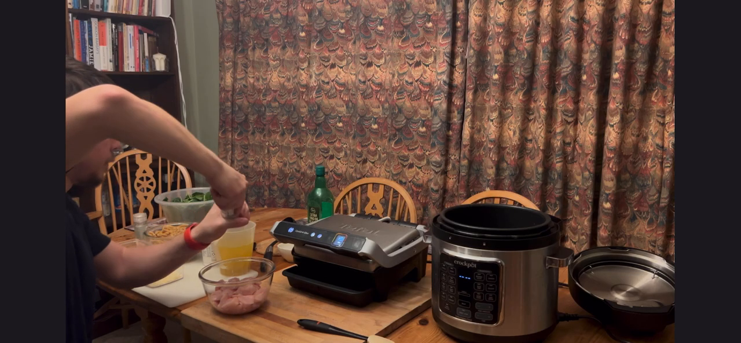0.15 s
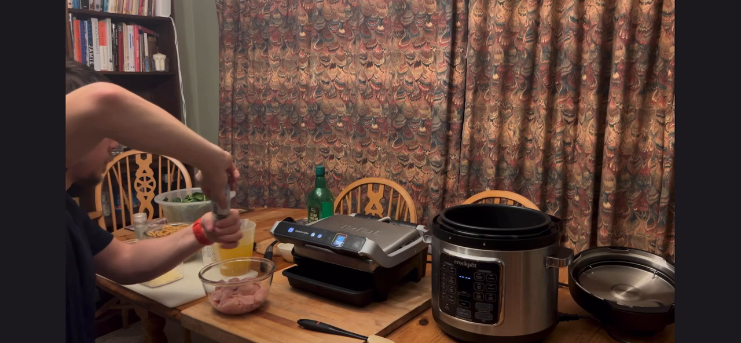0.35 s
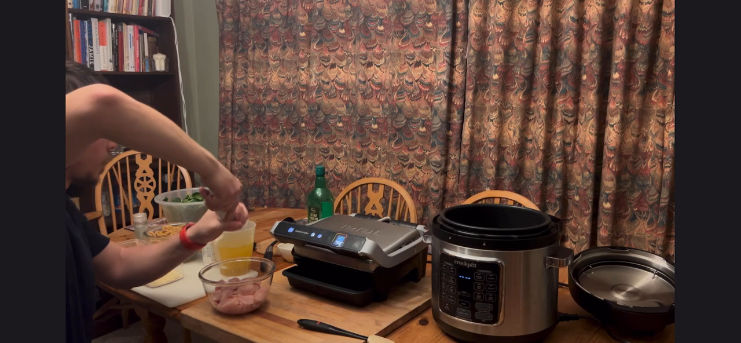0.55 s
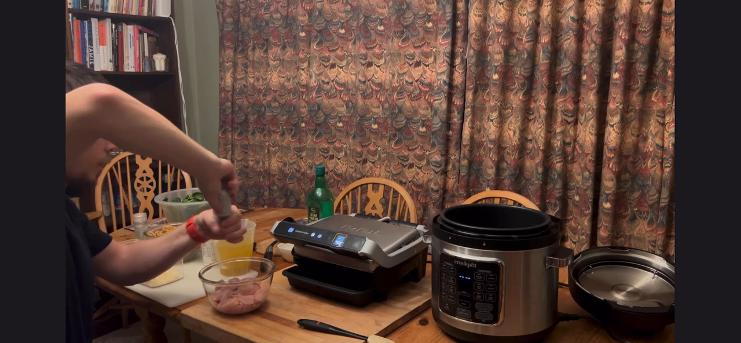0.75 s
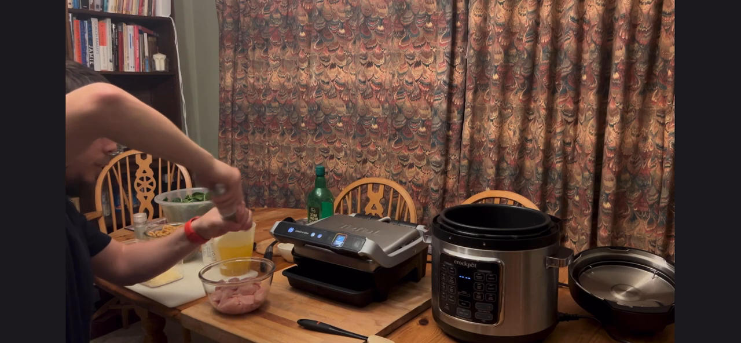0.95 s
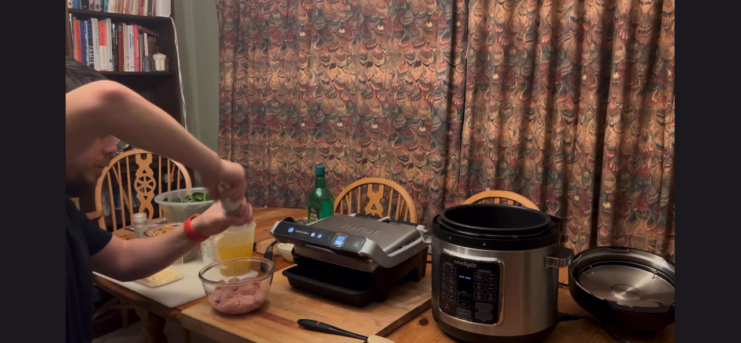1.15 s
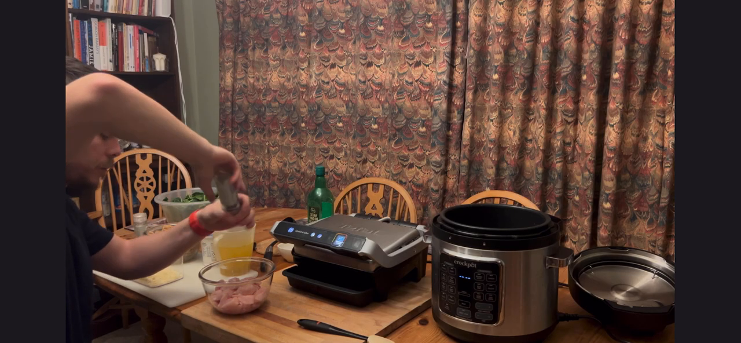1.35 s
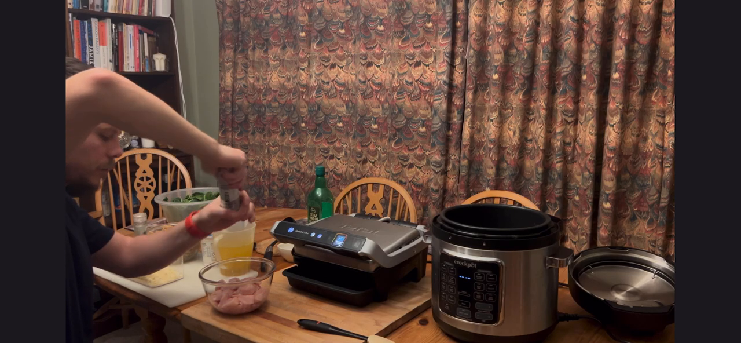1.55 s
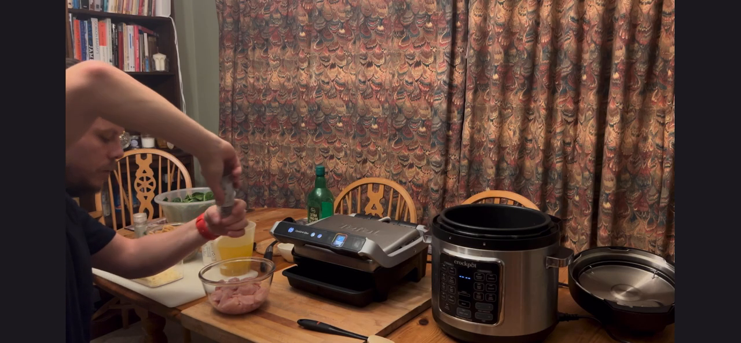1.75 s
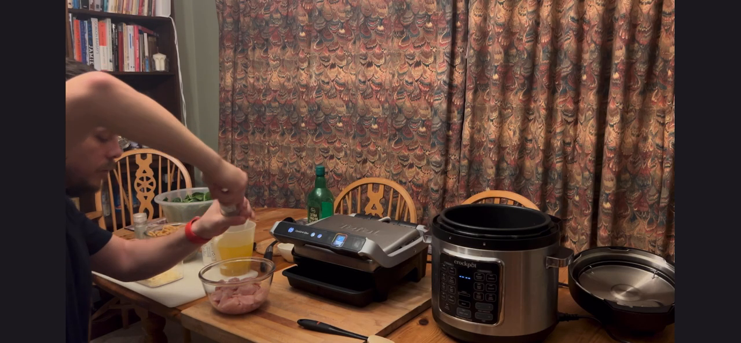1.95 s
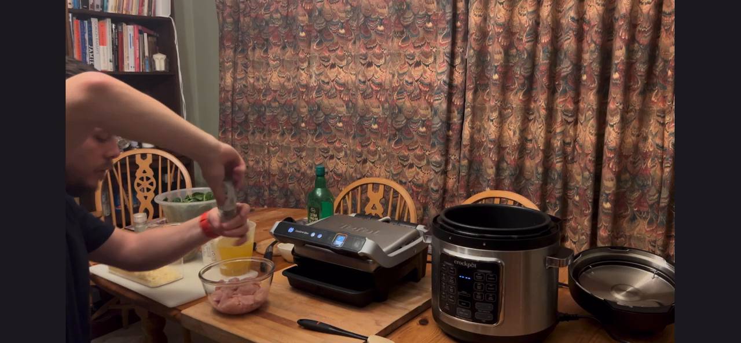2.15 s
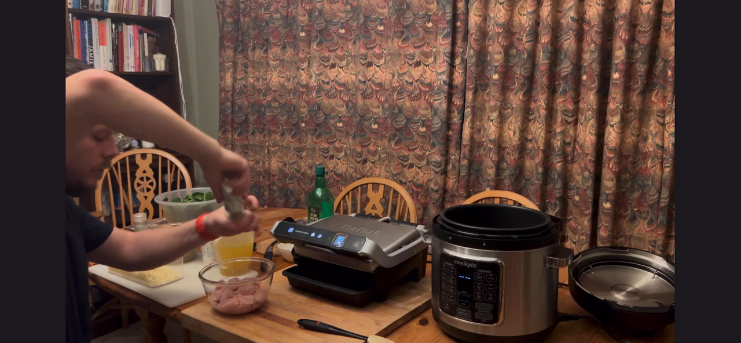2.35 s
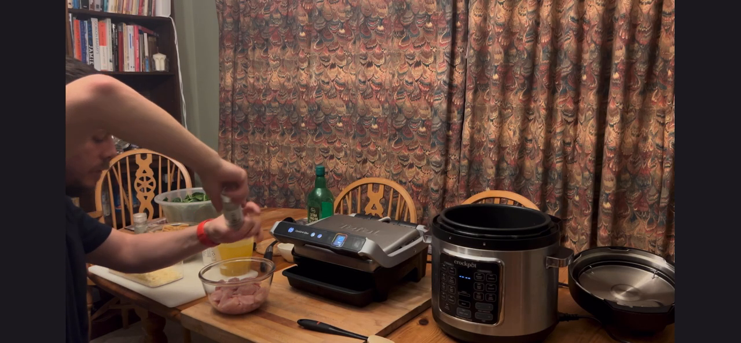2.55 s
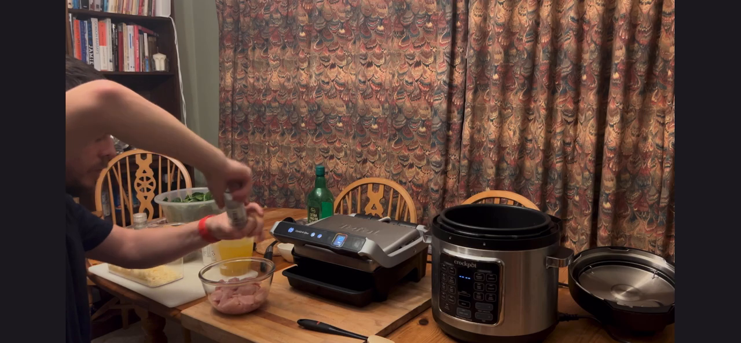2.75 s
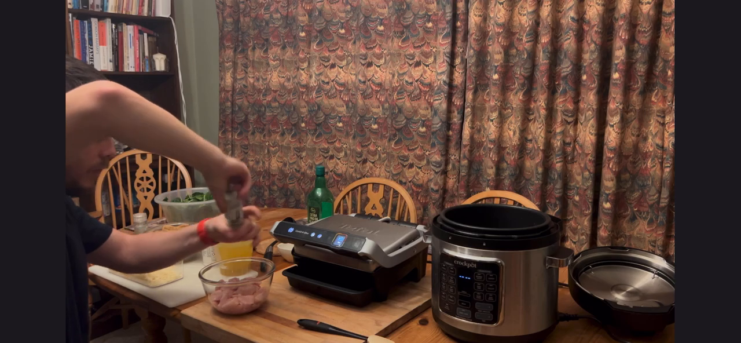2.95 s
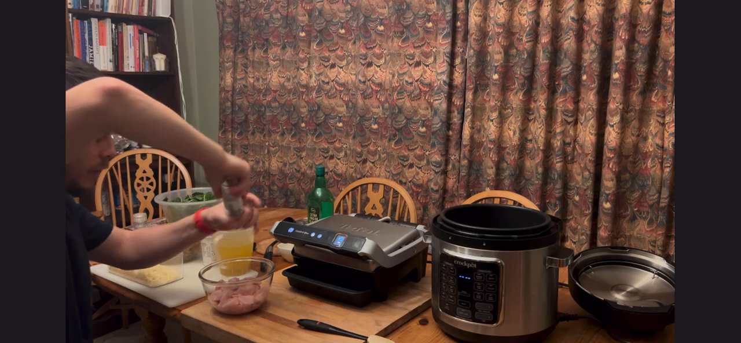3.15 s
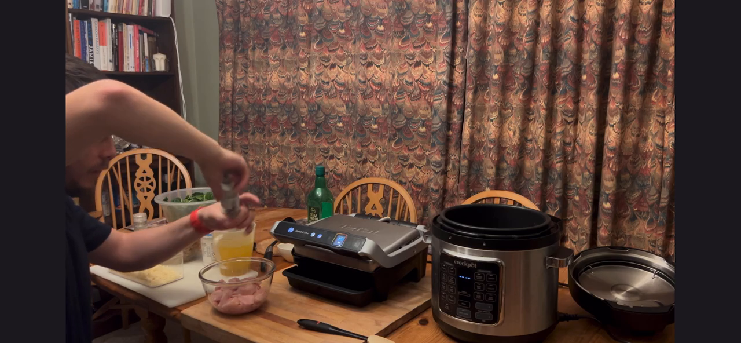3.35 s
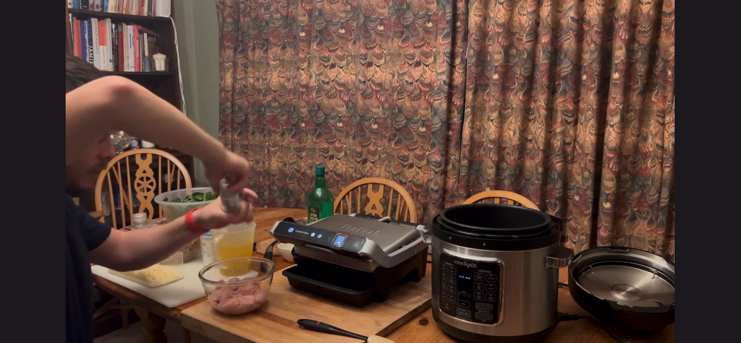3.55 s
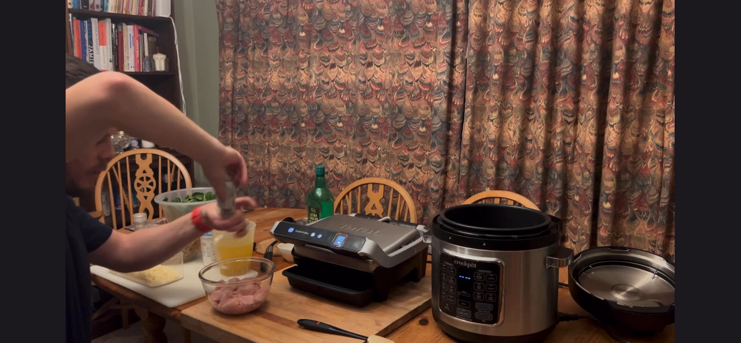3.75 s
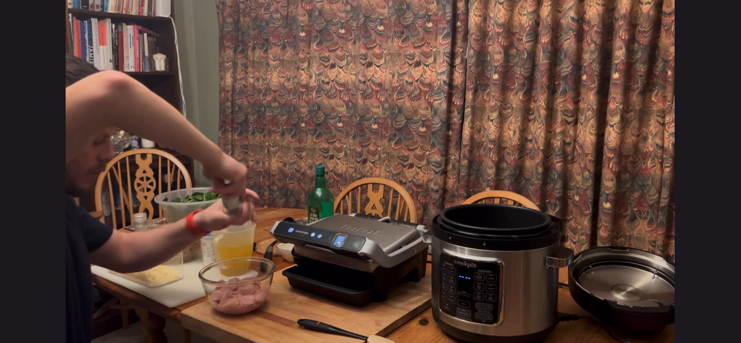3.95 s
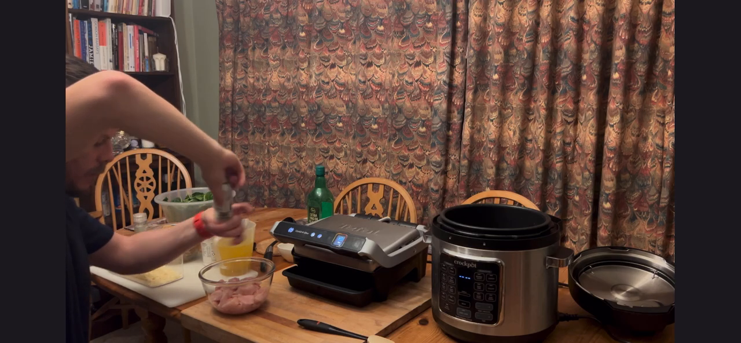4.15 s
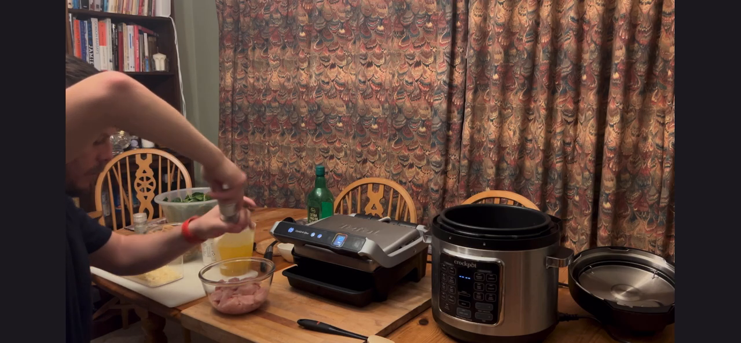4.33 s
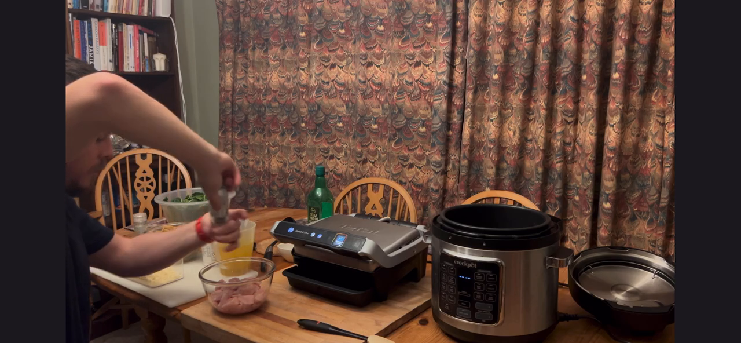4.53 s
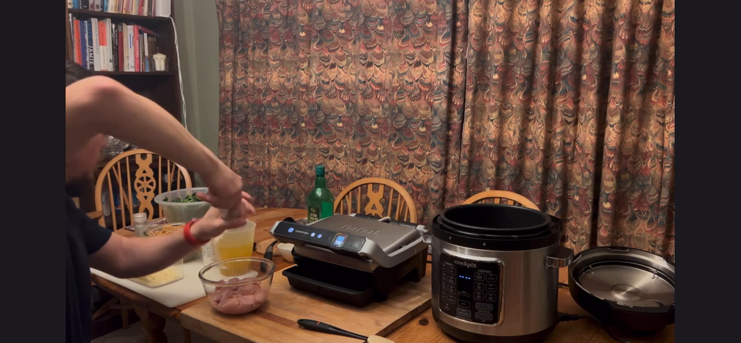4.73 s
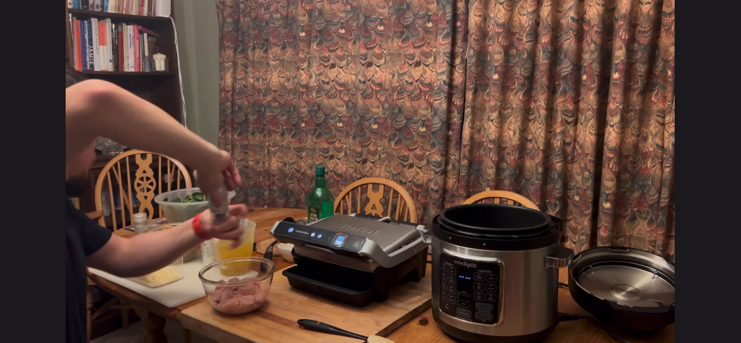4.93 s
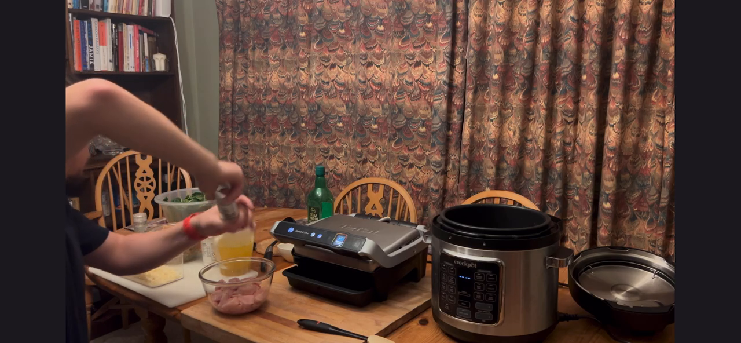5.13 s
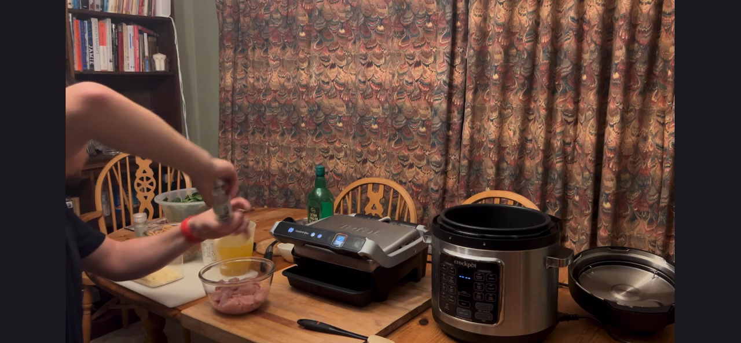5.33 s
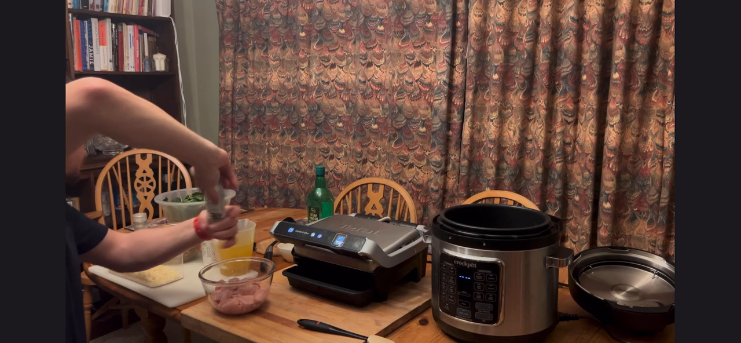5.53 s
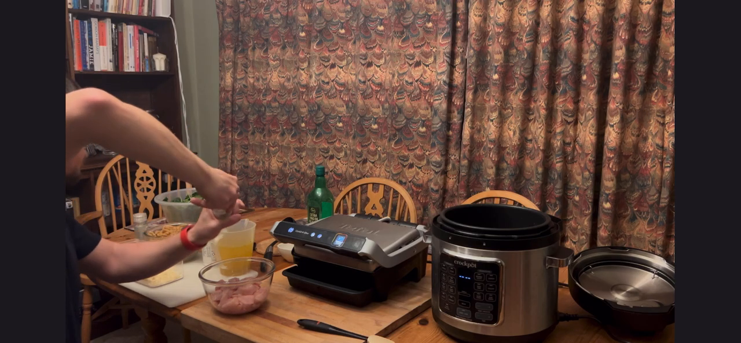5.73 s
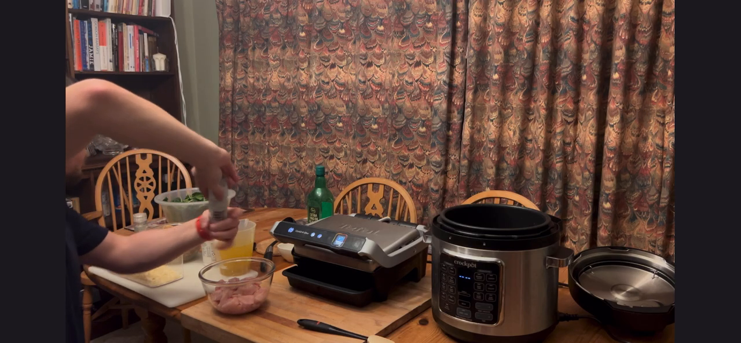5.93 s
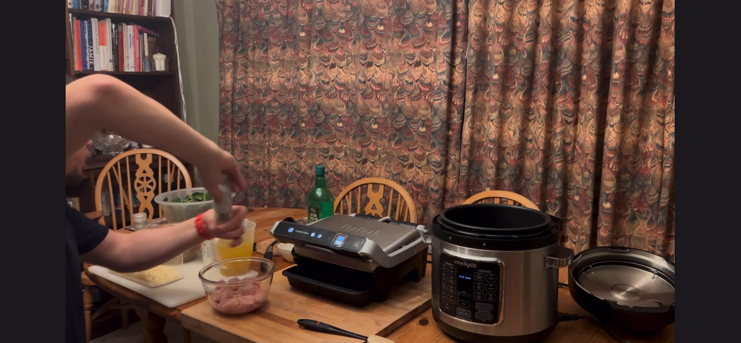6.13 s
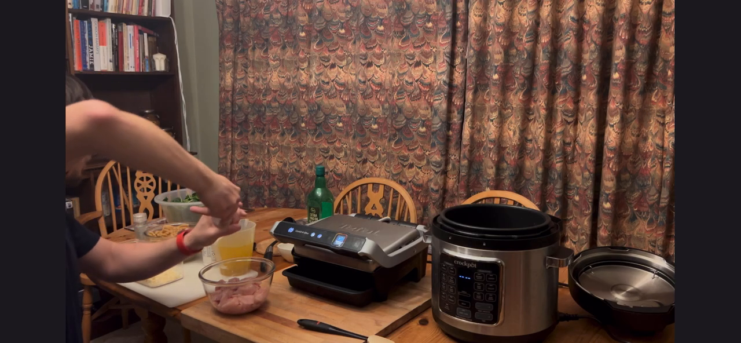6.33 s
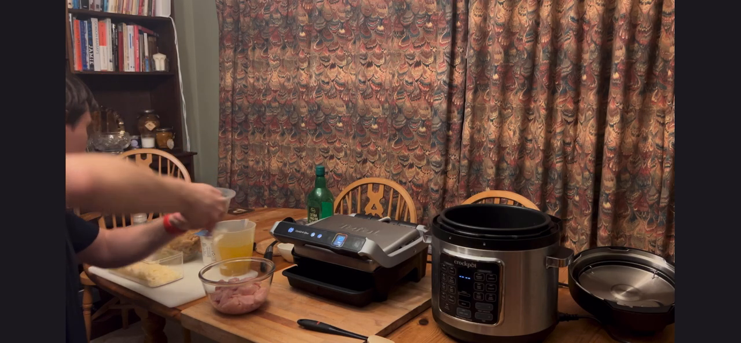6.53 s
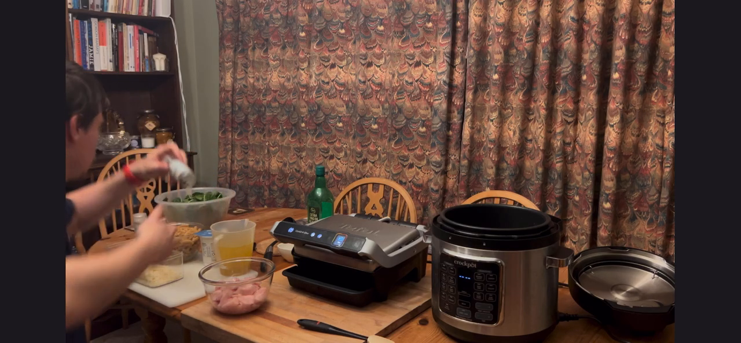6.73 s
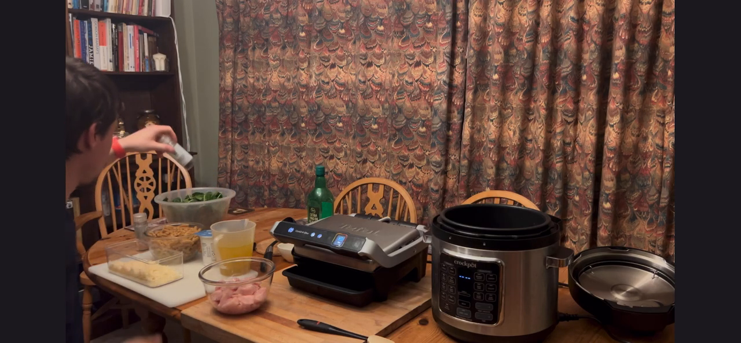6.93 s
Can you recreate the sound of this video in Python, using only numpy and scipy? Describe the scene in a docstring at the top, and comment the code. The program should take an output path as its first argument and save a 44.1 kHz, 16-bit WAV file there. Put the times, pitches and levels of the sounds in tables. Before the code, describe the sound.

A hand pepper mill is twisted in short, quick strokes, crunching and crackling unevenly in a small kitchen, then lifted away with a faint metallic tinkle.

```python
"""In a kitchen, a hand pepper mill is twisted back and forth over a bowl, four or five short twists a second.
The crunch is thousands of tiny noise snaps, coloured by the mill's barrel; its body rumbles underneath.
Sharp cracks are short noise bursts of corns and chips breaking; dull knocks are low bursts from the shaft.
Hands brush the mill in soft noise; at the end it is lifted away and its spring tinkles at a few pitches.
Fading noise makes the room's echo, and a faint hiss and low hum fill the quiet."""
import sys
import numpy as np
from scipy import signal
from scipy.fft import rfft, irfft, next_fast_len
from scipy.io import wavfile
from scipy.ndimage import uniform_filter1d, map_coordinates

SR = 44100
rng = np.random.default_rng(int(sys.argv[2]) if len(sys.argv) > 2 else 0)


def generate_wav(sig):
    """Save sig (samples, or channels by samples) to the path in sys.argv[1] as 16-bit PCM at SR."""
    pcm = np.round(np.clip(np.atleast_2d(sig).T, -1, 1) * 32767).astype(np.int16)
    wavfile.write(sys.argv[1], SR, pcm)


N = 312183  # length [samples]
TOP_HZ = 16100  # upper band limit


def amp(db):
    """Turn decibels into a gain."""
    return 10 ** (np.asarray(db) / 20)


def unit(x):
    """Scale to an average (rms) level of 1."""
    return x / np.sqrt(np.mean(x ** 2) + 1e-20)


def along(points, hz):
    """Read a curve of (frequency, value) points, joined by straight lines on a log frequency axis."""
    point_hz, value = np.transpose(points)
    return np.interp(np.log(hz + 1), np.log(point_hz + 1), value)


def bump(hz, centre_hz, octaves):
    """A bell-shaped curve around centre_hz on a log frequency axis, 1 at its top."""
    return np.exp(-(np.log2((hz + 1) / centre_hz) / octaves) ** 2)


def wobble(rate):
    """A smooth random curve through `rate` random points a second."""
    position = np.arange(N) * rate / SR
    return map_coordinates(rng.standard_normal(4096), [position], order=2, mode="wrap")


def resonances(modes, hz):
    """Each mode rings at its own frequency, and a wider mode dies away sooner; their responses add up."""
    total = 0
    for k, (centre, width, db) in enumerate(modes):
        mode = 1j * hz * width / (centre * centre - hz * hz + 1j * hz * width)
        total = total + (-1) ** k * amp(db) * mode  # neighbours have opposite signs
    return total


def filtered(x, response):
    """Multiply the spectrum of x by a response that depends on frequency."""
    m = next_fast_len(N + SR // 2)
    return irfft(rfft(x, m) * response(np.fft.rfftfreq(m, 1 / SR)), m)[..., :N]


def struck(x, colour_db, size=4096):
    """Colour x with a filter of energy 1 that answers only after each hit, never before it."""
    # folding the cepstrum onto its first half gives the minimum-phase filter
    cepstrum = irfft(np.log(amp(colour_db(np.fft.rfftfreq(size, 1 / SR))) + 1e-6))
    cepstrum[1:size // 2] *= 2
    cepstrum[size // 2 + 1:] = 0
    response = irfft(np.exp(rfft(cepstrum)))
    return signal.fftconvolve(x, response / np.linalg.norm(response))[:N]


def add(track, s, sound):
    """Mix a sound into a track at time s [s]."""
    start = max(0, round(s * SR))
    part = track[start:start + len(sound)]
    part += sound[:len(part)]


# twists of the mill: (start [s], end [s], relative crunch level [dB], growth from start to end [dB])
MILL_TWISTS = [(0, 0.096, -36.5, -6.5), (0.155, 0.27, -40.5, -3), (0.341, 0.432, -37, 5),
               (0.723, 0.822, -38, -6), (1.057, 1.173, -35, -1), (1.424, 1.477, -37, 7.5),
               (1.814, 1.864, -34, 8), (1.915, 1.96, -47, 6), (2.01, 2.134, -41, 7),
               (2.232, 2.278, -39.5, -8), (2.493, 2.543, -35, -4), (2.661, 2.754, -37.5, 9),
               (2.87, 2.99, -45.5, -10), (3.05, 3.176, -39, 6), (3.252, 3.38, -41.5, 1),
               (3.432, 3.568, -38, -3.5), (3.616, 3.755, -45, -2.5), (3.817, 3.947, -39, 2),
               (4.024, 4.135, -40, 2), (4.213, 4.335, -40.5, 4.5), (4.413, 4.538, -41, -4.5),
               (4.593, 4.722, -38.5, 2.5), (4.792, 4.917, -41.5, 7), (5.013, 5.149, -36, 9),
               (5.2, 5.357, -45.5, 0), (5.45, 5.599, -41, 12.5), (5.703, 5.871, -44, 3),
               (5.909, 5.93, -41.5, 5), (6.032, 6.194, -39.5, 7)]
TWIST_ARCH_DB = 1  # the hand presses hardest midway through a twist


def effort(ramp=0.0097):
    """Strength of the crunch: a twist bites within ramp [s], grows or fades, arches in its middle, and stops."""
    force = np.zeros(N)
    for start, end, db, growth_db in MILL_TWISTS:
        t = np.arange(max(round((end - start) * SR), 2)) / SR
        turning = np.clip(np.minimum(t, t[-1] - t) / ramp, 0, 1)
        progress = t / t[-1] - .5
        arch_db = TWIST_ARCH_DB * (np.cos(np.pi * progress) - 2 / np.pi)
        add(force, start, turning * amp(db + growth_db * progress + arch_db))
    return force


def fragments(count, spread_db, clump_db, clump_rate, t60, ring_db, size=96):
    """Tiny fractures at random moments, mostly small and in clumps; each lifts or cuts its own pitch band."""
    draws = rng.random((count, 3))
    strength = amp(spread_db * np.minimum(-np.log(1 - draws[:, 1]), 2.5))
    pitch_hz = 1500 * 10 ** draws[:, 2:]  # anywhere from 1500 to 15000 Hz
    colour = amp(ring_db * bump(np.fft.rfftfreq(size, 1 / SR), pitch_hz, octaves=0.27))
    noise = irfft(rfft(rng.standard_normal((count, size))) * colour)
    snaps = noise * amp(-60 * np.arange(size) / SR / t60)  # 60 dB down after t60 [s]
    where = (draws[:, :1] * N).astype(int) + np.arange(size)
    run = np.bincount(where.ravel(), (snaps * strength[:, None]).ravel(), N)[:N]
    run = run * amp(clump_db * wobble(clump_rate))
    # the hand's steady pressure evens the run out over 40 ms
    power = np.abs(uniform_filter1d(run ** 2, SR // 25))
    return run / np.sqrt(power + np.mean(run ** 2) / 20)


# breaking pepper heard through the mill: (frequency [Hz], relative level per Hz [dB])
CRUNCH_COLOUR = [(100, -43), (300, -12), (620, -22), (900, -6.5), (1300, -12), (1700, -4), (2700, -12),
                 (3600, -2), (5200, -7), (6500, -1), (8000, 1.5), (10500, -0.5), (13000, -4.5),
                 (15500, -7.5)]
# resonances of the mill's barrel: (frequency [Hz], width [Hz], lift, or dip if negative [dB])
BARREL_MODES = [(1010, 340, -5), (1760, 260, -5), (2020, 110, -4), (3360, 250, -0.5), (4300, 480, 1),
                (4350, 810, 0), (5000, 350, 0), (6000, 540, 2), (8050, 170, 3)]


def barrel_db(hz):
    """Colour of a break inside the mill: a broad crunch, raised or lowered at the barrel's resonances."""
    colour_db = along(CRUNCH_COLOUR, hz)
    for centre, width, db in BARREL_MODES:
        colour_db = colour_db + db / (1 + (2 * (hz - centre) / width) ** 2)
    return colour_db


# modes of the hollow body shaken by the shaft: (frequency [Hz], width [Hz], relative level [dB])
BODY_MODES = [(209, 56, -9.5), (293, 95, -10), (354, 54, -2.5), (393, 42, 0.5), (465, 53, -2.5),
              (534, 88, -12), (770, 79, -10.5)]


def grinding(force, crunch_db=-4.5, rumble_db=-55.0, follow=0.38):
    """Each twist crumbles pepper between the burrs, and the jerking shaft shakes the hollow body."""
    crumbs = force * fragments(count=9000, spread_db=3.0, clump_db=4.0, clump_rate=83, t60=0.0045, ring_db=7.5)
    jerks = fragments(count=1500, spread_db=8, clump_db=1, clump_rate=65, t60=0.0019, ring_db=-39.0)
    jerks = force ** follow * jerks  # the rumble follows the force only weakly
    rumble = struck(jerks, lambda hz: 20 * np.log10(np.abs(resonances(BODY_MODES, hz)) + 1e-5))
    return amp(crunch_db) * struck(crumbs, barrel_db) + amp(rumble_db) * rumble


# chips: level over the crunch [dB], scatter of level [dB], scatter of brightness [dB per octave]
CHIP_DB, CHIP_SCATTER_DB, CHIP_TILT_DB = 7, 2.5, 6.5


def chips(force, count=100):
    """Smaller pieces break at chance moments, as hard as the hand presses: rows like those of the cracks."""
    moments = ((np.arange(count) + rng.random(count)) * (N - 1) / count).astype(int)
    rows = []
    for at, (loud, bright) in zip(moments, rng.standard_normal((count, 2))):
        db = 20 * np.log10(force[at] + 1e-9) + CHIP_DB + CHIP_SCATTER_DB * loud
        rows.append((at / SR, db, CHIP_TILT_DB * bright))
    return rows


# whole peppercorns cracking: (time [s], relative level [dB], brightness [dB per octave])
CORN_CRACKS = [(.0151, -33.5, 4), (.0746, -19.5, 1), (.386, -17.5, 4), (.3966, -25, -3), (.4468, -25, -1.5),
               (.7442, -18.5, -.5), (1.0685, -26, 3), (1.107, -24.5, -1), (1.4312, -35, 1), (1.82, -14, 1),
               (2.0693, -24.5, 2), (2.1243, -17.5, 5), (2.2722, -24.5, 1), (2.4972, -25.5, 10),
               (2.5203, -21, 13), (2.57, -22, 2), (2.7408, -24, 0.5), (2.9458, -24, 2),
               (2.9825, -22.5, 0.5), (3.0438, -26, 3.5), (3.105, -21.5, 0), (3.3435, -25, 4),
               (3.5313, -26, 2), (3.7261, -29, 1), (3.825, -31, 4), (3.8537, -21.5, -.5),
               (3.894, -27, -5.5), (4.0496, -31.5, -6), (4.2195, -39, 4), (4.243, -24.5, 4),
               (4.2968, -28, -7.5), (4.4519, -28, 3), (4.4803, -28, 12), (4.516, -21, 5), (4.6752, -24, -2),
               (4.6908, -22, 3.5), (4.816, -28.5, -2), (4.8793, -18.5, 4.5), (4.9527, -31, 2),
               (5.0219, -33, 1.5), (5.0392, -27.5, 5), (5.1363, -21.5, 2.5), (5.2259, -29, 14),
               (5.2406, -23.5, 1.5), (5.2774, -26.5, 0.5), (5.3197, -25.5, 4.5), (5.4751, -25, 0),
               (5.5118, -24.5, -0.5), (5.5411, -19.5, -0.5), (5.7206, -31, 5), (5.7469, -27.5, 2.5),
               (5.8478, -23, 1), (6.0692, -28, -1), (6.1415, -21.5, 0.5), (6.1643, -26.5, -2)]
RING_HZ, RING_OCTAVES = 6520, .7  # each break rings at its own pitch: centre, scatter


def cracking(breaks, crack_db=0, snap_t60=0.0016, splinter_db=-8, splinter_t60=0.014,
             pivot_hz=7500, ring_db=6, rise=0.00015, size=1024):
    """A piece splits with one snap and a short spray of splinters, at its own brightness and pitch."""
    track, t, hz = np.zeros(N), np.arange(size) / SR, np.fft.rfftfreq(size, 1 / SR)
    octaves = np.log2(np.clip(hz, 2200, 14000) / pivot_hz)  # the tilt levels off outside this range
    envelope = amp(-60 * t / snap_t60) + amp(splinter_db - 60 * t / splinter_t60)
    envelope = envelope * (1 - np.exp(-t / rise))
    lead = size // 8  # room before the burst for the filter's spread
    for s, db, tilt_db in breaks:
        ring_hz = RING_HZ * 2 ** (RING_OCTAVES * rng.standard_normal())
        spectrum = rfft(np.roll(envelope * rng.standard_normal(size), lead))
        # a fracture excites all bands alike
        spectrum /= np.sqrt(uniform_filter1d(np.abs(spectrum) ** 2, size=40))
        colour = amp(tilt_db * octaves + ring_db * bump(hz, ring_hz, octaves=0.36))
        burst = irfft(spectrum * colour * (hz < TOP_HZ))
        burst = burst * np.sqrt(SR / 1000 / np.sum(burst ** 2))  # energy of 1 ms at rms 1
        add(track, s - lead / SR, amp(db) * burst)
    return amp(crack_db) * struck(track, barrel_db)


# the shaft catching hard: (time [s], relative level [dB])
SHAFT_KNOCKS = [(.049, -55), (.253, -48.5), (2.086, -43.5), (2.265, -48), (2.521, -42.5), (2.668, -46),
                (2.694, -46), (2.873, -47.5), (4.105, -51), (4.688, -49.5), (4.902, -48.5), (5.111, -61),
                (5.243, -49.5), (5.849, -46.5)]
KNOCK_HZ = 401  # centre pitch of the hollow body


def knocking(knock_db=0, t60=0.039, rise=0.00053, spread=0.44):
    """The shaft catches on a corn and lets go with a dull, hollow knock: a fading burst of low noise."""
    track, t = np.zeros(N), np.arange(SR // 8) / SR
    hz = np.fft.rfftfreq(len(t), 1 / SR)
    envelope = amp(-60 * t / t60) * (1 - np.exp(-t / rise))
    for s, db in SHAFT_KNOCKS:
        noise = irfft(rfft(rng.standard_normal(len(t))) * bump(hz, KNOCK_HZ, spread), len(t))
        knock = envelope * noise
        knock = knock * np.linalg.norm(envelope) / np.linalg.norm(knock) / np.sqrt(2)  # same energy each time
        add(track, s, amp(db + knock_db) * knock)
    return track


# hands shifting on the mill: (time [s], time to fade by 60 dB [s], relative level [dB], pitch [Hz])
HAND_BRUSHES = [(1.365, 0.11, -63.5, 1310), (1.732, 0.074, -56.5, 990), (6.68, 0.18, -68, 503),
                (6.694, 0.025, -62, 5500), (6.711, 0.039, -48, 3400), (6.733, 0.019, -64, 3200),
                (6.945, 0.092, -59, 1480)]
# the loose spring is jolted: (time [s], relative ring level [dB], relative tick level [dB])
SPRING_JOLTS = [(6.61, -55, -60), (6.67, -62, -48.5), (6.696, -63, -42.5), (6.867, -54.5, -48.5),
                (6.913, -60, -53), (6.948, -77, -53)]
# the spring's modes: (frequency [Hz], width [Hz], relative level [dB])
SPRING_MODES = [(6210, 140, -7), (7900, 200, -11), (11100, 200, -19), (14150, 100, 5)]


def handling(brush_width=0.99, brush_rise=0.0021, ring_db=-2, ring_t60=0.37, tick_t60=0.011):
    """Fingers bump and brush the barrel, and jolts make the spring tick and jingle."""
    track, t = np.zeros(N), np.arange(SR // 2) / SR
    hz = np.fft.rfftfreq(len(t), 1 / SR)

    def noise(response):
        """Random noise of this colour."""
        return unit(irfft(rfft(rng.standard_normal(len(t))) * response))

    for s, t60, db, pitch_hz in HAND_BRUSHES:
        envelope = amp(db - 60 * t / t60) * (1 - np.exp(-t / brush_rise))
        add(track, s, envelope * noise(bump(hz, pitch_hz, brush_width)))
    for s, db, tick_db in SPRING_JOLTS:
        ring = amp(db + ring_db - 60 * t / ring_t60) * noise(resonances(SPRING_MODES, hz))
        tick = amp(tick_db - 60 * t / tick_t60) * noise(np.sqrt(hz) * (hz < TOP_HZ))
        add(track, s, ring + tick)
    return track


# decay of the room: (frequency [Hz], time to fade by 60 dB [s])
ROOM_DECAY = [(200, 0.38), (530, 0.23), (1400, 0.22), (3700, 0.2), (9700, 0.18), (15000, 0.16)]
# strength of the room's answer: (frequency [Hz], level [dB])
ECHO_LEVEL = [(200, 7), (1000, 1.5), (4000, 0.5), (8000, -3), (11000, -3.5), (15000, -2.5)]


def kitchen(x, build_up=0.00037, count=160):
    """Mid and side of the echo: fading noise, redrawn for each short block as the arms and mill move."""
    wet, step = np.zeros((2, N)), N // count + 1
    for start in range(0, N, step):
        hz, t, z = signal.stft(rng.standard_normal((2, SR // 2)), SR, nperseg=256)
        z = z * amp(-60 * t / along(ROOM_DECAY, hz)[:, None]) * (1 - np.exp(-t / build_up))
        z = z / np.linalg.norm(z, axis=2, keepdims=True)  # every band returns the same energy
        tails = signal.istft(z, SR, nperseg=256)[1]
        for channel, tail in zip(wet, tails):
            echo = signal.fftconvolve(x[start:start + step], tail / np.linalg.norm(tail))
            add(channel, start / SR, echo)
    return filtered(wet, lambda hz: amp(along(ECHO_LEVEL, hz)))


# hiss of the quiet kitchen: (frequency [Hz], relative level per Hz [dB])
HISS_COLOUR = [(22, -28), (45, -5), (100, 2), (160, -2.5), (250, -14), (400, -15), (650, -24), (1000, -15),
               (1500, -10.5), (2000, -15.5), (2800, -14), (4500, -19.5), (15500, -15)]
# low hum of the kitchen: (time [s], relative level [dB])
HUM_LEVEL = [(0, -68.5), (1.9, -66), (2.3, -61), (3.3, -60), (4, -62.5), (7, -62)]


def ambience(floor_db=-63, hum_db=-4, hum_hz=65, hum_width=0.91, swell_db=2.0):
    """Mid and side of the still room: steady coloured noise, and a hum of low noise that swells at random."""
    hiss = unit(filtered(rng.standard_normal((2, N)), lambda hz: amp(along(HISS_COLOUR, hz))))
    hum = unit(filtered(rng.standard_normal((2, N)), lambda hz: bump(hz, hum_hz, hum_width)))
    level_db = np.interp(np.arange(N) / SR, *np.transpose(HUM_LEVEL)) + swell_db * wobble(4.93)
    return amp(floor_db) * hiss + amp(hum_db + level_db) * hum


# width of the echo and background: (frequency [Hz], gain on the side signal [dB])
SIDE_WIDTH = [(60, -17), (350, -9.5), (700, -1.5), (1500, -0.5), (4500, -4), (6000, 4), (7200, -30),
              (15000, -17)]


def scene(crunch_room_db=0, crack_room_db=-1.5):
    """The mill's direct sound in the middle, with the echo and the still room spread around it."""
    force = effort()
    crunch = grinding(force) + knocking() + handling()
    cracks = cracking(list(CORN_CRACKS) + chips(force))
    to_room = amp(crunch_room_db) * crunch + amp(crack_room_db) * cracks
    mid, side = kitchen(to_room) + ambience()
    mid = mid + crunch + cracks
    side = filtered(side, lambda hz: amp(along(SIDE_WIDTH, hz)))
    return np.array([mid + side, mid - side])


# the left port's advantage: (frequency [Hz], left minus right [dB])
LEFT_BALANCE = [(100, 0.5), (400, 1.5), (950, 0.5), (1200, 8.5), (1700, 0), (2600, 3), (4500, 5.5),
                (6200, 2), (7500, 0)]


def record(dry):
    """Two ports: the left is mostly louder and hears the treble later; a steep cut ends the band."""
    def ports(hz):
        late_cycles = .00026 * np.maximum(hz - 7650, 0)  # left lags right by 0.26 ms above 7650 Hz
        left = amp(along(LEFT_BALANCE, hz) / 2) * np.exp(-1j * np.pi * late_cycles)
        return np.array([left, 1 / left])
    return filtered(filtered(dry, ports), lambda hz: 1 / (1 + (hz / TOP_HZ) ** 120))


dry = scene()
out = record(dry)
generate_wav(out)
```